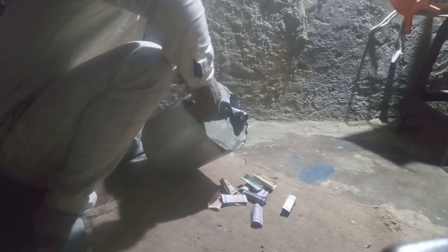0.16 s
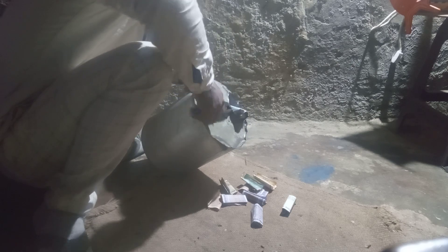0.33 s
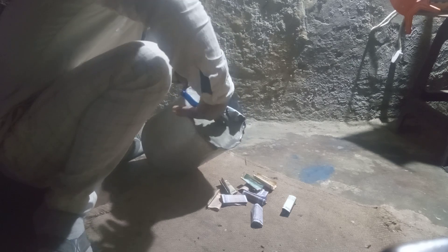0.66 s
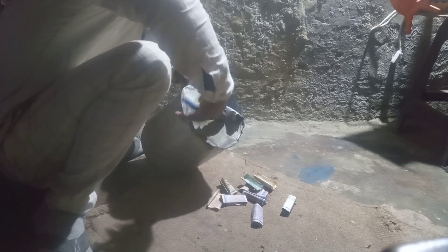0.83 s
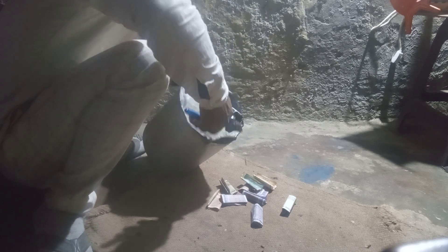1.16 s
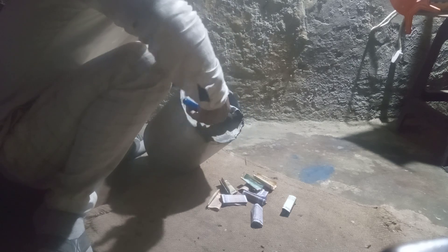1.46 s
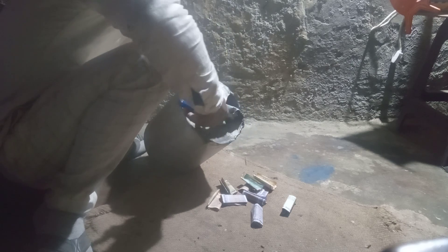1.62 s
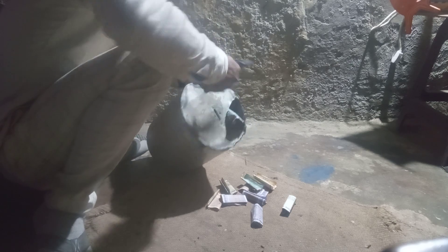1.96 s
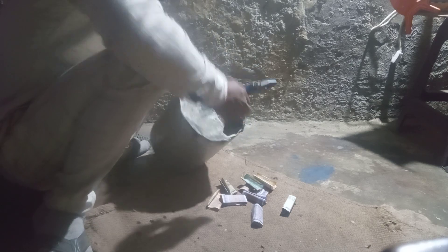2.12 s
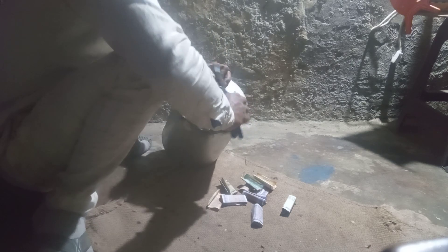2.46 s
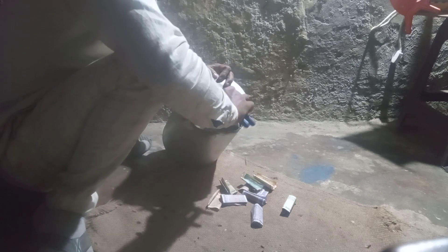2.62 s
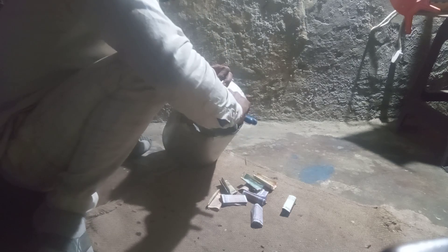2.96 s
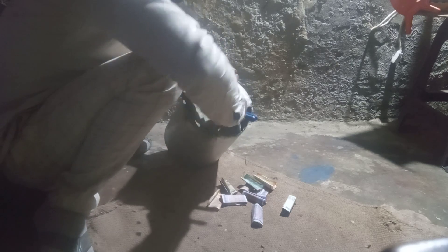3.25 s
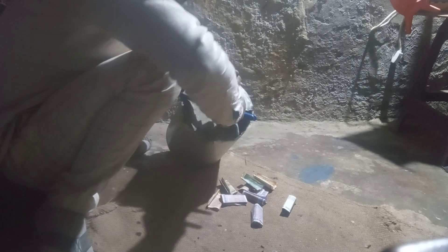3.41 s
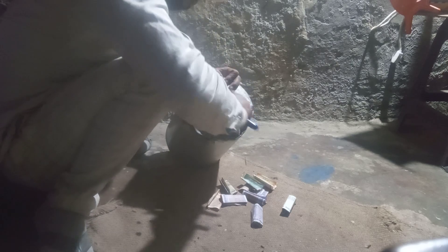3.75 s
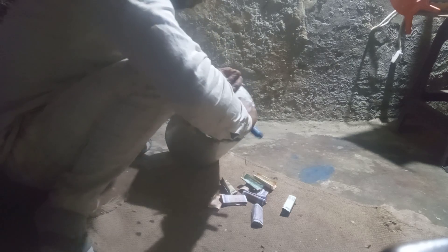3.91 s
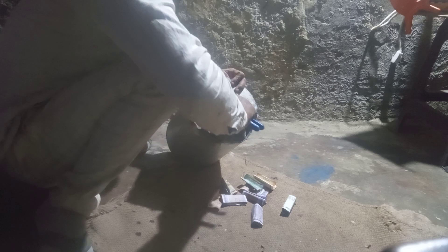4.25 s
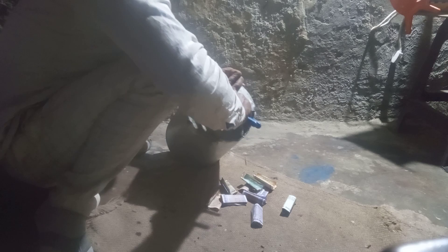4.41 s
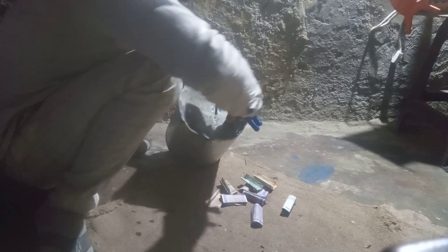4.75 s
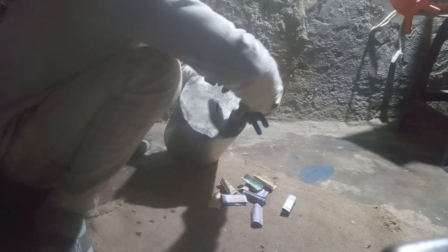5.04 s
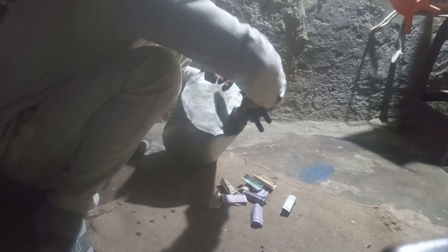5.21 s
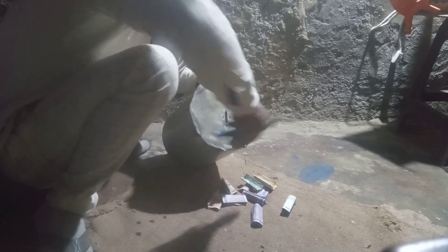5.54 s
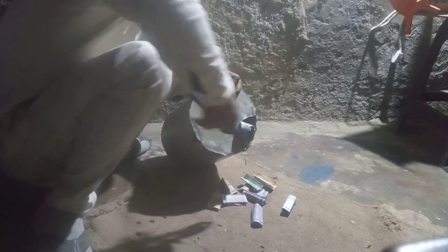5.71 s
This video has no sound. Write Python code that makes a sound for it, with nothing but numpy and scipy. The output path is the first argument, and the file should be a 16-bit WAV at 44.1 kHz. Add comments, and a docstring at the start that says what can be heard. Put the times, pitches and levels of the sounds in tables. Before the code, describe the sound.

Irregular tinny clanks, short scrapes and hollow thuds as a tool bends open a metal box rocking on the floor indoors.

```python
"""A small, hard-walled room, one microphone: on the floor a thin sheet-metal coin bank is pried open.
A hand tool scrapes along the cut lid, catches and slips; the sheet buckles with clanks and hollow thumps,
and the can rocks on the floor. Bending changes the sheet's tension, so each clank has its own low wall
note and rim note. A faint steady rush lies under it."""
import sys
import numpy as np
from scipy import signal
from scipy.fft import rfft, irfft, next_fast_len
from scipy.io import wavfile
from scipy.ndimage import map_coordinates

SR = 44100
rng = np.random.default_rng(int(sys.argv[2]) if len(sys.argv) > 2 else 0)


def pcm_store(signal):
    """Save signal as 16-bit PCM."""
    levels = np.round(np.clip(np.atleast_2d(signal), -1, 1) * 32767)
    wavfile.write(sys.argv[1], SR, levels.astype(np.int16).T)


N = 258867
AGE = np.arange(SR) / SR  # time since a contact (s)
ONSET_S = 0.035  # the opening stretch that sets a contact's level


def clanks():
    """The edge lets go in a run of jolts; a buckling wall booms, a blunt contact lets the rim sing."""
    # slips and buckles: start_s, strength_db, buckle_db (extra thump), hardness_db_per_octave,
    # wall_hz, rim_hz
    buckles = [(0.623, -35, -6, 2.5, 295, 840), (0.84, -38, 3.5, 1, 357.3, 834),
               (1.371, -25.5, 0, 2, 313, 921), (1.409, -27, -8.5, 1.5, 189, 810),
               (1.486, -30.5, 4.5, 0.5, 318, 710), (1.504, -29, 1, 2.2, 196, 893),
               (1.747, -25.5, -4, 1.2, 309, 1344), (1.778, -25.5, -3.5, -2.5, 303.6, 930),
               (1.821, -22, -7, -2, 297, 939), (1.843, -18, -11.5, 4, 259, 956),
               (1.892, -29.5, 2, 3.5, 268, 971), (2.45, -42, -4.5, -1, 380, 1180),
               (3.225, -37, -1, -3.5, 184, 633), (3.274, -28, -0.5, -0.5, 253, 665),
               (3.284, -35, 7, 0, 264.7, 743), (3.321, -36.5, 0.5, 0.5, 264.6, 1520),
               (4.216, -40.5, 9, 1.3, 300, 769), (4.248, -43.5, 7, -3, 193.7, 992),
               (4.665, -22, 0.5, -4, 253.6, 844), (4.682, -24.5, 4, -9.5, 198.6, 866),
               (4.717, -40, 8.5, -15, 190.8, 867), (5.099, -39.5, 1, 5, 268, 1130),
               (5.141, -37, -2, -3.5, 188.4, 967)]
    # band balance at zero hardness: thump_db, clank_db, crack_db, fizz_db
    balance_db = [0.5, -0.5, -11, -23]
    # spectrum of the sheet's dense modes: frequency_hz, relative_db
    rattle_spectrum = [(70, -52.5), (110, -31.5), (150, -9.5), (205, -4.5), (320, -0.5), (450, -11),
                       (580, -14.5), (850, -5), (1100, -11), (1350, -8), (2100, -23), (4000, -28.5),
                       (6800, -31.5), (9000, -59.5)]
    out = np.zeros(N)
    for start_s, strength_db, buckle_db, hardness, wall_hz, rim_hz in buckles:
        levels_db = band_levels(strength_db, hardness, balance_db)
        levels_db[0] = strength_db + balance_db[0] + buckle_db  # the thump follows the buckle
        excess_db = strength_db + 32  # over an ordinary clank
        slip_s = max(0.016 * amp(-0.14 * excess_db), 0.002)  # quicker under more force
        force = 0.44 * stick_slip(per_s=330) * np.exp(-AGE / slip_s)
        force[0] = 1  # the first jolt
        rattle = coloured(in_room(force, direct_db=-14.5, early_s=0.016), rattle_spectrum)
        sheet = unit_onset(rattle) + amp(-4) * unit_onset(sheet_ring())
        sheet = highpassed(sheet, hz=0.54 * wall_hz)
        thump, clank, crack, fizz = split_bands(sheet, levels_db, ONSET_S)
        wall_note = ring(wall_hz, t60_s=0.32, attack_s=0.0026, waver_rad=0.13)
        rim_note = ring(rim_hz, t60_s=0.23, attack_s=0.012, waver_rad=0.6)
        thump = with_note(thump, wall_note, levels_db[0], note_db=3 + 0.63 * buckle_db)
        clank = with_note(clank, rim_note, levels_db[1], note_db=-4.5 + 0.28 * excess_db - 0.39 * hardness)
        add(out, start_s, thump + clank + crack + fizz)
    return out


def sheet_ring():
    """The sheet's modes ring, at new strengths for each point of contact."""
    # modes of the sheet: pitch_hz, relative_db, t60_s
    sheet_modes = [(154.2, -9, 0.32), (221.6, -2, 0.12), (310, -9, 0.28), (445, -14.5, .28),
                   (638, -9, 0.33), (743, 6.5, 0.14), (1260, -4, 0.25), (1319, 1, 0.19), (1374, -5, 0.11),
                   (1502, -10.5, 0.36), (1533, -10.5, 0.32), (1740, -12, 0.39), (1823, -19, 0.38),
                   (2125, -14.5, 0.24), (2326, -18.5, 0.32), (2370, -22, 0.11), (2920, -21, 0.18),
                   (3330, -21.5, .16), (3980, -23.5, 0.16)]
    hz, db, t60_s = np.transpose(sheet_modes)[:, :, None]
    t = AGE[:SR // 2]
    db = db + rng.normal(0, 2.5, db.shape)
    hz = hz * rng.normal(1, 0.003, hz.shape)
    modes = amp(db - 60 * t / t60_s) * np.sin(2 * np.pi * (hz * t + rng.random(hz.shape)))
    attack = 1 - np.exp(-t / 0.0084)
    return np.pad(modes.sum(axis=0) * attack, (0, SR - len(t)))


def scrapes():
    """The tool drags over the tin: a swell of small slips that makes the wall drone."""
    # strokes of tool and hand: time_s, strength_db, hardness_db_per_octave, wall_hz
    strokes = [(0.166, -56.5, -3.5, 356), (0.225, -52.5, -3.5, 355.3), (0.525, -45, -0.7, 390.5),
               (0.57, -48, 1.5, 233), (0.662, -39.5, 2, 299.6), (0.757, -51.5, -4, 306.6),
               (0.795, -49, -5, 357), (0.866, -45, 3, 189), (1.011, -52, 6.5, 313), (1.053, -48.5, 1, 308),
               (1.44, -34, -0.2, 189.5), (1.47, -35.5, 4, 320), (2.564, -49.5, 0, 312),
               (2.613, -50.5, -0.5, 344), (3.632, -46, 1, 271), (3.712, -49, .5, 246), (3.912, -51, 0, 277),
               (4.052, -52.5, 2.5, 340), (5.485, -51.5, 2.5, 180)]
    # band balance at zero hardness: thump_db (shared with the drone), clank_db, crack_db, fizz_db
    balance_db = [5, 0.5, -9, -20.5]
    # spectrum of the rubbed tin: frequency_hz, relative_db
    rubbing_spectrum = [(70, -39), (140, -12), (200, -8), (320, -4), (390, -5), (520, -15), (800, -12),
                        (1050, -18.5), (1550, -10.5), (2000, -25.5), (3300, -21.5), (4500, -36),
                        (6800, -33.5), (9000, -70.5)]
    stroke_s = 0.04
    pressure = np.abs(np.sin(np.pi * np.minimum(AGE / stroke_s, 1)))
    out = np.zeros(N)
    for time_s, strength_db, hardness, wall_hz in strokes:
        levels_db = band_levels(strength_db, hardness, balance_db)
        force = stick_slip(per_s=1800) * pressure
        rubbing = coloured(in_room(force, direct_db=-9.5, early_s=0.006), rubbing_spectrum)
        thump, *upper = split_bands(rubbing, levels_db, stroke_s + ONSET_S / 2)
        wall_note = ring(wall_hz, t60_s=0.18, attack_s=stroke_s, waver_rad=0.12)
        drone = amp(levels_db[0] - 3.5) * unit_onset(wall_note)
        add(out, time_s - 0.01, amp(-3) * thump + drone + sum(upper))
    return out


def floor_knocks():
    """Hard levering rocks the can on the floor, and its whole body thuds."""
    # the can meets the floor: start_s, level_db
    knocks = [(0.535, -44), (0.845, -41), (1.847, -37), (3.279, -33.5), (4.218, -33.5), (4.667, -27),
              (5.104, -40.5)]
    # low modes of the whole can: pitch_hz, relative_db, t60_s
    body_modes = [(157, -3, 0.2), (185, -6, 0.48), (235.4, -4, .25)]
    out = np.zeros(N)
    for start_s, level_db in knocks:
        thud = sum(amp(db) * ring(hz, t60_s, attack_s=0.0051, waver_rad=0.2)
                   for hz, db, t60_s in body_modes)
        add(out, start_s, amp(level_db) * unit_onset(highpassed(thud, hz=119)))
    return out


def stick_slip(per_s):
    """The tool catches and slips: tiny jolts of random size at random moments."""
    return (rng.random(SR) < per_s / SR) * rng.standard_normal(SR)


def ring(hz, t60_s, attack_s, waver_rad):
    """One dying mode with a wavering phase, as when the sheet springs back."""
    phase = 2 * np.pi * (hz * AGE + rng.random()) + waver_rad * wobble(50, SR)
    return np.sin(phase) * amp(-60 * AGE / t60_s) * (1 - np.exp(-AGE / attack_s))


def band_levels(strength_db, hardness, balance_db):
    """Thump, clank, crack and fizz levels: the harder the contact, the more they tilt to the treble."""
    # each band's distance from the clank band: offset_octaves
    band_octaves = [-2.5, 0, 1.64, 2.5]
    return strength_db + np.array(balance_db) + hardness * np.array(band_octaves)


def split_bands(x, levels_db, onset_s):
    """Split a contact into thump, clank, crack and fizz, each at its own level."""
    # edges of the four bands: low_hz, high_hz
    band_edges = [(60, 520), (520, 2000), (2000, 4300), (4300, 9500)]
    filters = [signal.butter(3, edges, "bandpass", fs=SR, output="sos") for edges in band_edges]
    return [amp(db) * unit_onset(signal.sosfilt(sos, x), onset_s) for db, sos in zip(levels_db, filters)]


def with_note(rattle, note, level_db, note_db):
    """Share a band's power between dense rattle and one clear note, note_db above the rattle."""
    return amp(level_db) * unit_onset(unit_onset(rattle) + amp(note_db) * unit_onset(note))


def in_room(x, direct_db, early_s):
    """The way to the microphone: direct sound, wall echoes crowding in, a tail whose treble dies first."""
    # the room's decay: frequency_hz, t60_s
    decay_times = [(100, 0.56), (250, 0.22), (500, 0.28), (1000, 0.3), (3000, 0.23), (7500, 0.16)]
    hz, t, noise = signal.stft(rng.standard_normal(SR), SR, nperseg=256)
    fade = amp(-60 * np.maximum(t - early_s, 0) / along(decay_times, hz)[:, None])
    build_up = 1 - 0.24 * np.exp(-AGE / 0.022)
    response = signal.istft(noise * fade, SR, nperseg=256)[1][:SR] * build_up
    response /= np.linalg.norm(response)
    response[0] += amp(direct_db)
    return signal.fftconvolve(x, response)[:SR]


def room_boom():
    """A low room mode hangs on after the strongest clank."""
    out = np.zeros(N)
    add(out, start_s=1.86, sound=amp(-46) * ring(hz=88, t60_s=1.1, attack_s=0.03, waver_rad=0.086))
    return out


def room_tone():
    """A steady rush with a few faint, wavering tones."""
    # spectrum of the rush: frequency_hz, relative_db
    rush_spectrum = [(18, -64.5), (30, -53), (130, -8.5), (207, -5), (232, -5), (345, -3), (446, -7),
                     (501, -9.5), (662, -7), (710, -12.5), (1080, -7.5), (1180, -5), (1760, -18.5),
                     (6480, -28.5), (7800, -42), (10100, -76.5), (17200, -120)]
    # faint tones: pitch_hz, relative_db
    tones = [(344.5, -58), (506.0, -59), (699.8, -60), (1200, -59.5)]
    rush = coloured(rng.standard_normal(N), rush_spectrum)
    t = np.arange(N) / SR
    hum = np.zeros(N)
    for hz, db in tones:
        gain = amp(db + 1.9 * wobble(9.6, N))
        hum += gain * np.sin(2 * np.pi * hz * t + 0.69 * wobble(12, N))
    rush_db = -45.5 + 0.26 * wobble(4.6, N)
    return amp(rush_db) * rush / rms(rush) + amp(2.5) * hum


def amp(db):
    """Decibels to gain."""
    return 10 ** (np.asarray(db) / 20)


def rms(x):
    """Root mean square."""
    return np.sqrt(np.mean(x ** 2) + 1e-20)


def unit_onset(x, onset_s=ONSET_S):
    """Scale a sound to rms 1 over its first moments."""
    return x / rms(x[:int(onset_s * SR)])


def along(points, hz):
    """Read (frequency_hz, value) points on a log frequency axis."""
    point_hz, values = np.transpose(points)
    return np.interp(np.log(hz + 1), np.log(point_hz + 1), values)


def add(track, start_s, sound):
    """Mix a sound into the track from start_s."""
    part = track[max(round(start_s * SR), 0):][:len(sound)]
    part += sound[:len(part)]


def wobble(knots_per_s, size):
    """A smooth random curve."""
    knots = rng.standard_normal(int(size * knots_per_s / SR) + 4)
    return map_coordinates(knots, [np.arange(size) * knots_per_s / SR])


def coloured(x, spectrum):
    """Causal filter through (frequency_hz, gain_db) points."""
    size = next_fast_len(len(x) + SR // 4, True)
    gain = amp(along(spectrum, np.fft.rfftfreq(size, 1 / SR)))
    cepstrum = irfft(np.log(gain + 1e-6), size)
    cepstrum[1:size // 2] *= 2  # minimum phase: nothing rings ahead of the contact
    cepstrum[size // 2 + 1:] = 0
    return irfft(rfft(x, size) * np.exp(rfft(cepstrum, size)), size)[:len(x)]


def highpassed(x, hz):
    """Roll off what lies below hz."""
    return signal.sosfilt(signal.butter(2, hz, "highpass", fs=SR, output="sos"), x)


def scene():
    """Everything as one microphone hears it; the small tin radiates little deep bass."""
    tin = highpassed(clanks() + scrapes() + floor_knocks(), hz=84)
    return (tin + room_boom() + room_tone())[None]


def record(dry):
    """The recorder keeps nothing above its band limit."""
    top_hz = 7800
    size = next_fast_len(N + SR // 4)
    hz = np.fft.rfftfreq(size, 1 / SR)
    return irfft(rfft(dry, size) / np.sqrt(1 + (hz / top_hz) ** 90), size)[:, :N]


dry = scene()
out = record(dry)
pcm_store(out)
```